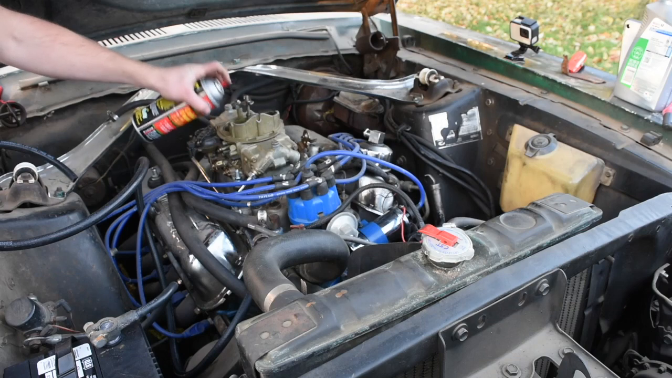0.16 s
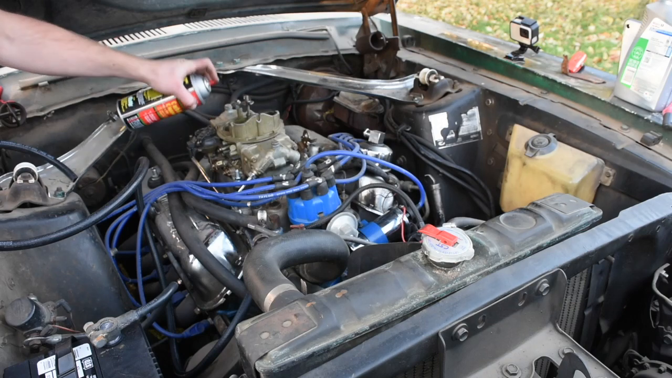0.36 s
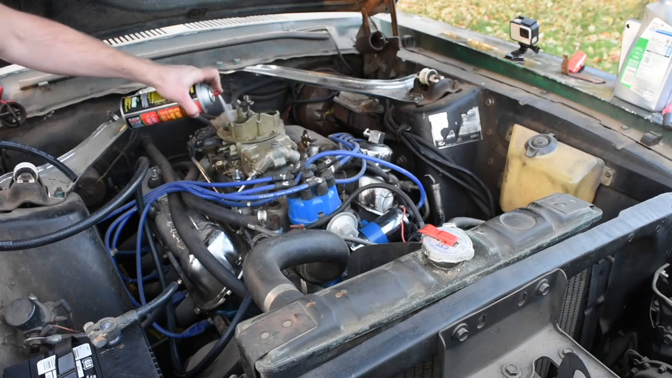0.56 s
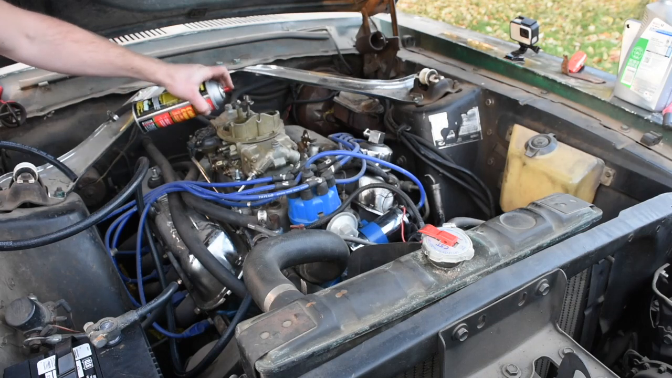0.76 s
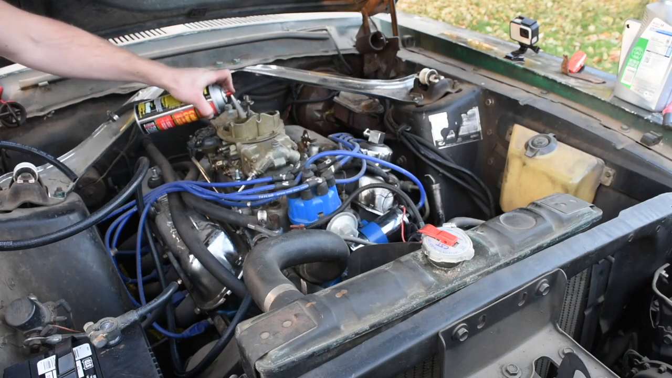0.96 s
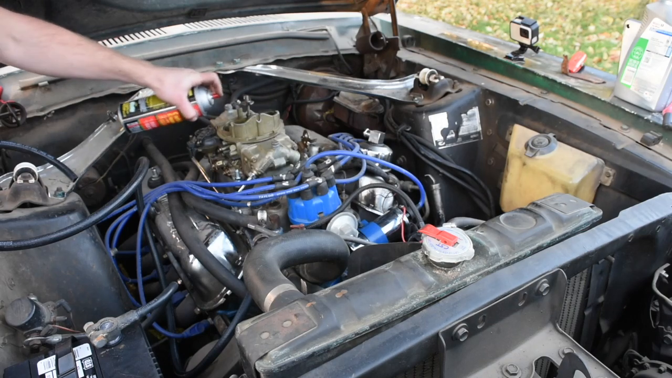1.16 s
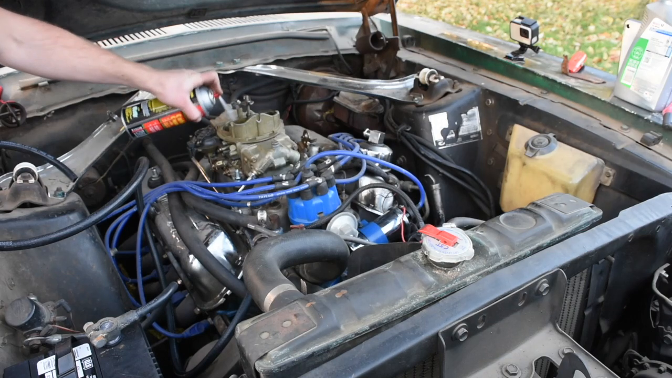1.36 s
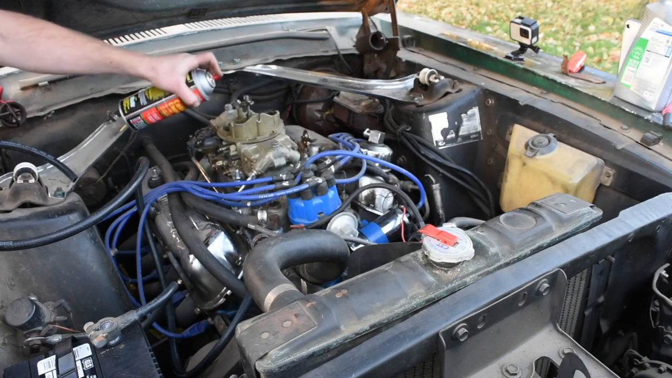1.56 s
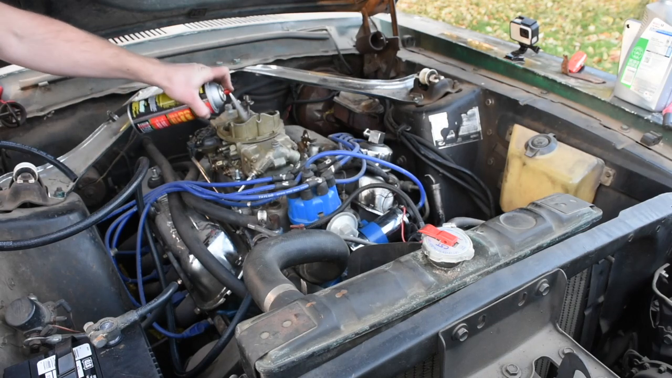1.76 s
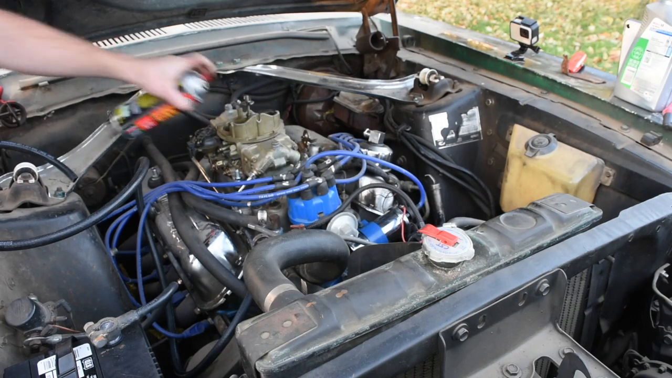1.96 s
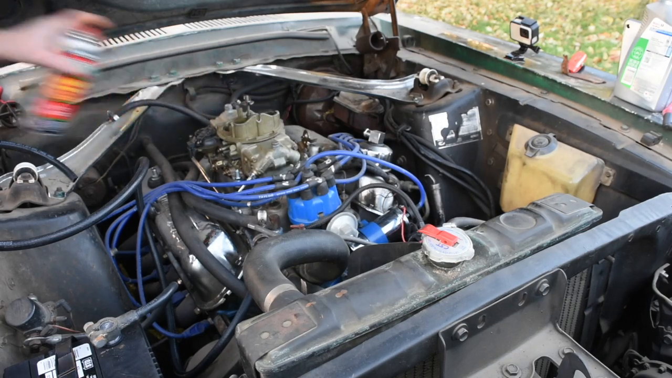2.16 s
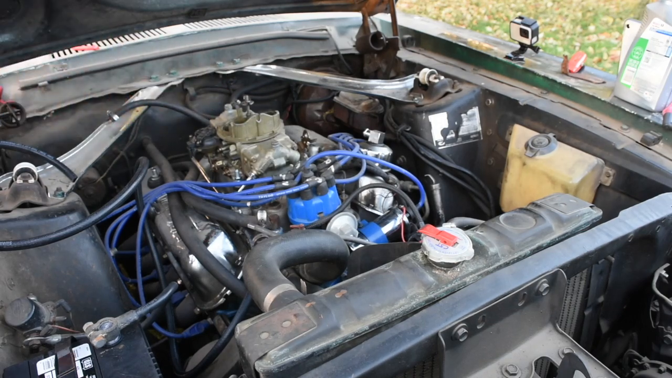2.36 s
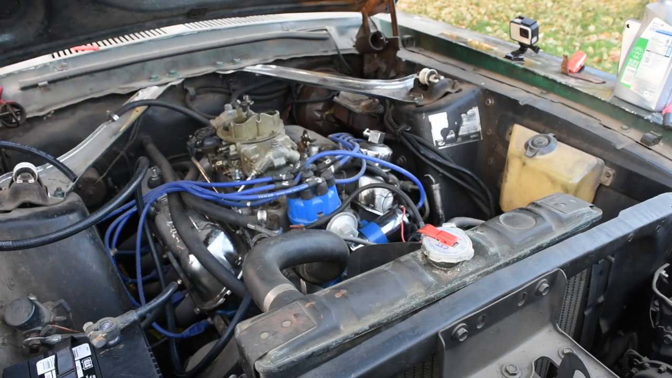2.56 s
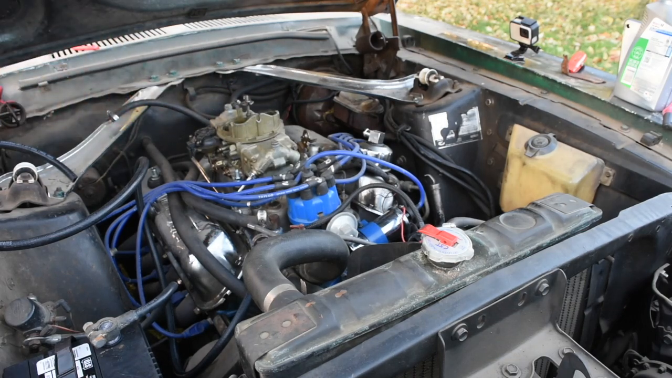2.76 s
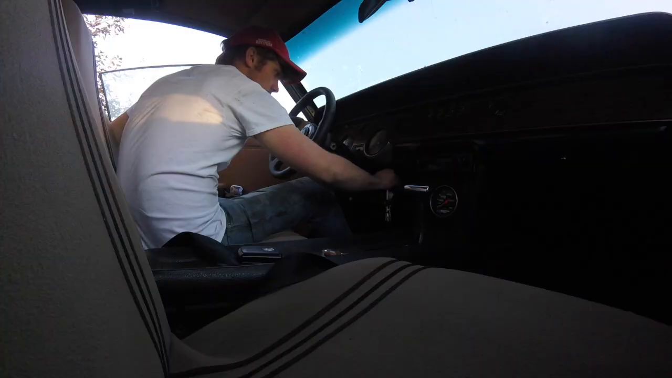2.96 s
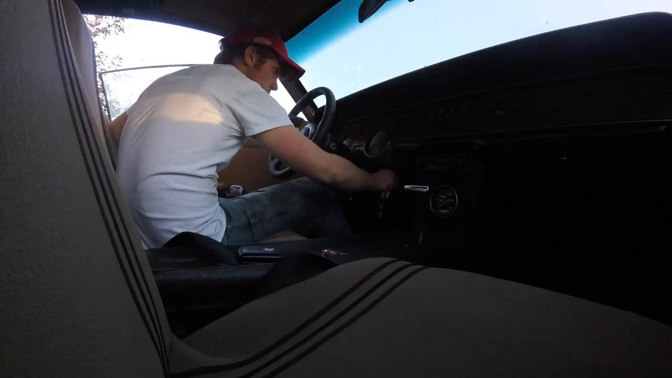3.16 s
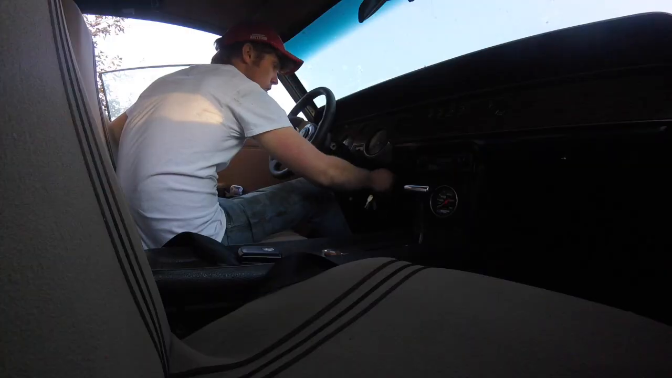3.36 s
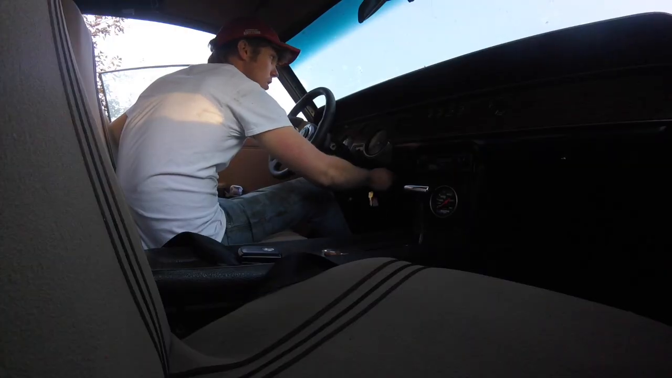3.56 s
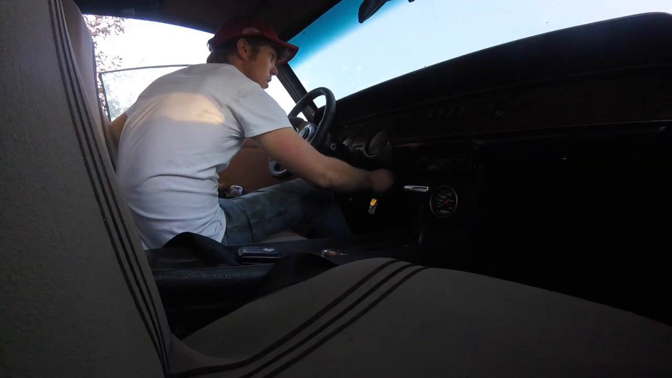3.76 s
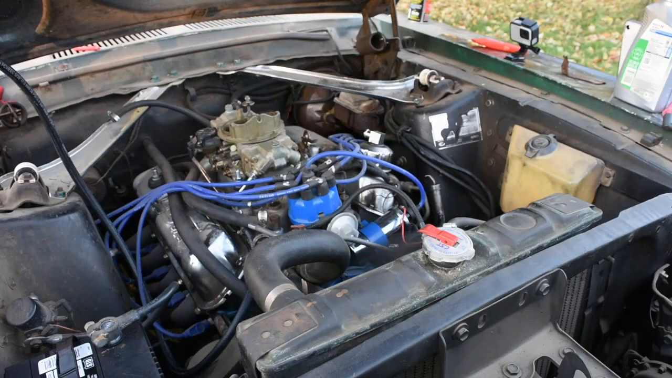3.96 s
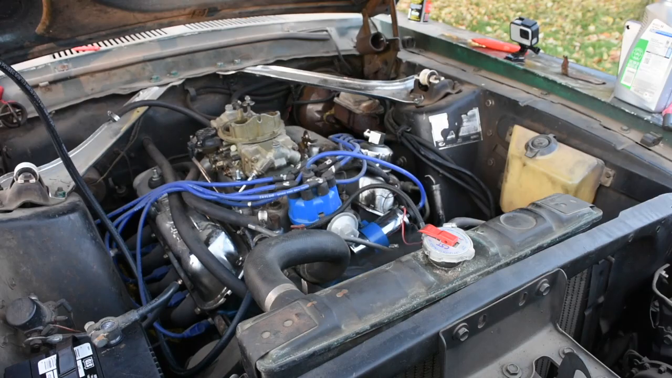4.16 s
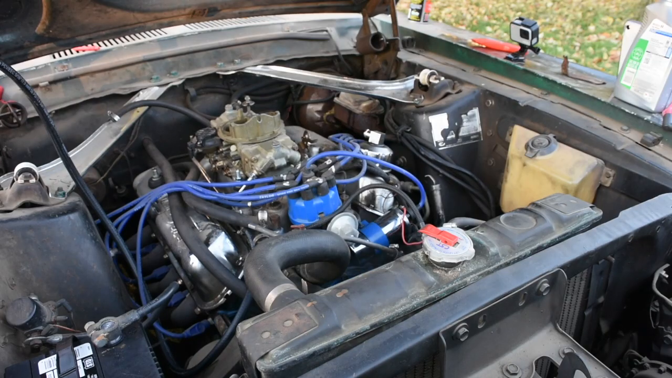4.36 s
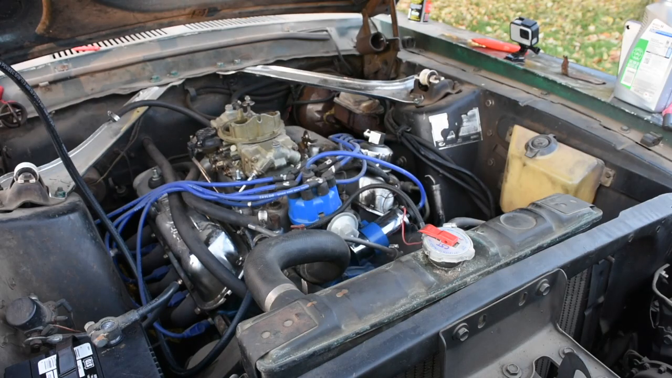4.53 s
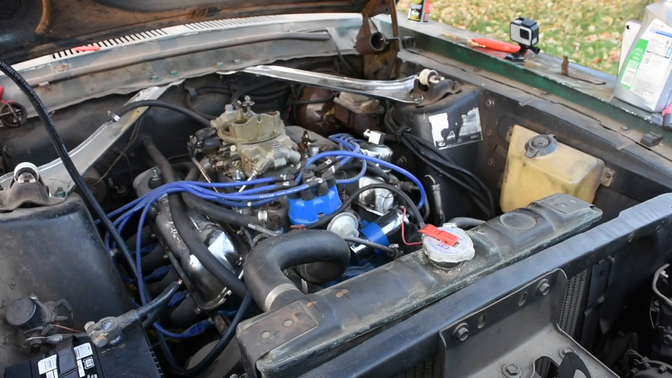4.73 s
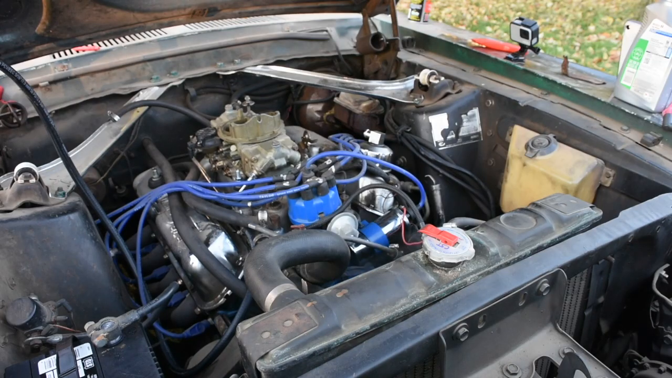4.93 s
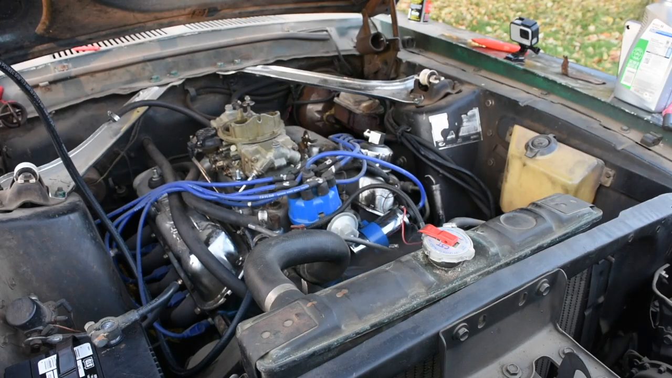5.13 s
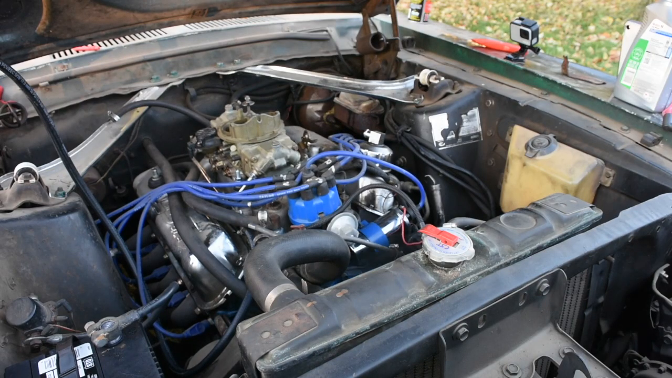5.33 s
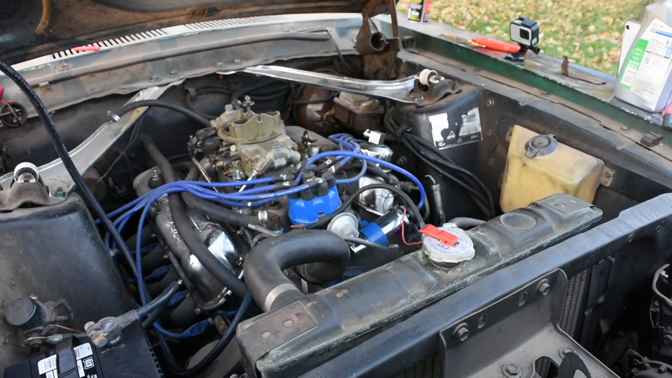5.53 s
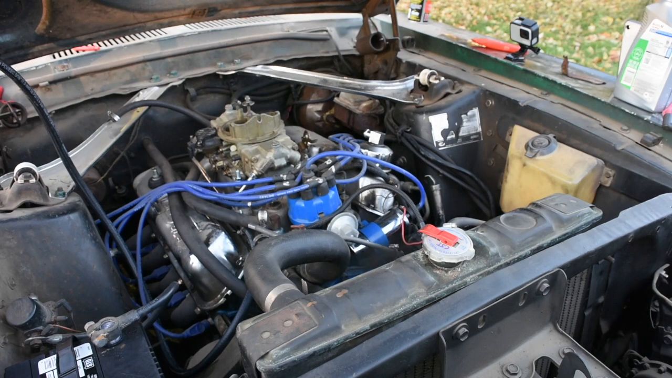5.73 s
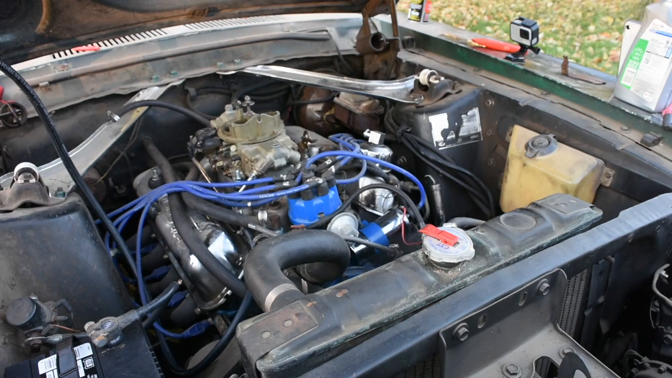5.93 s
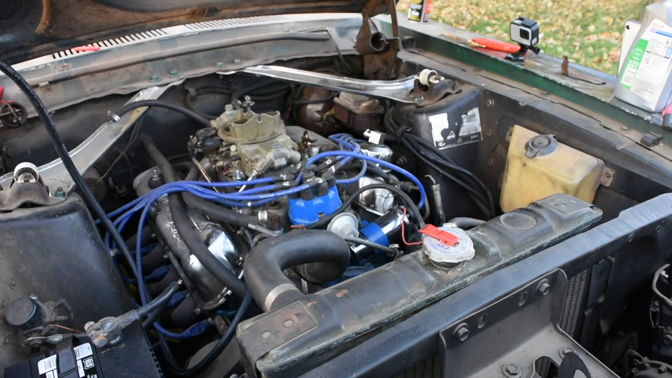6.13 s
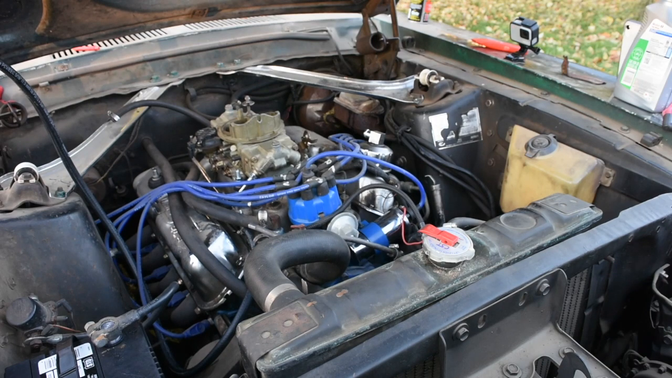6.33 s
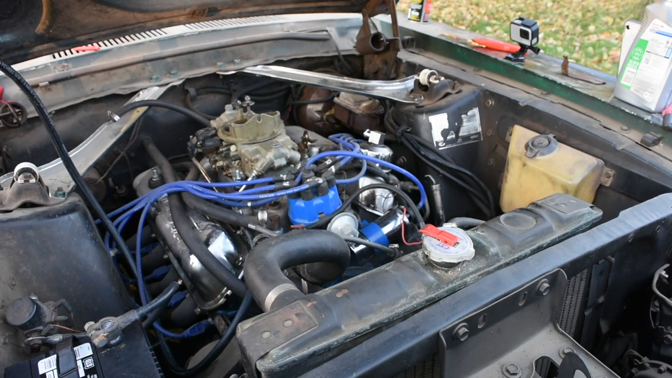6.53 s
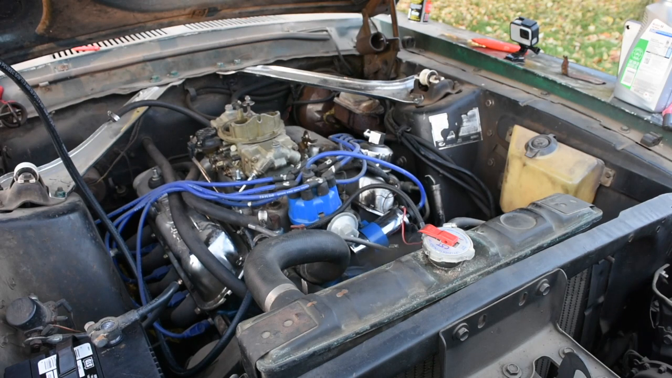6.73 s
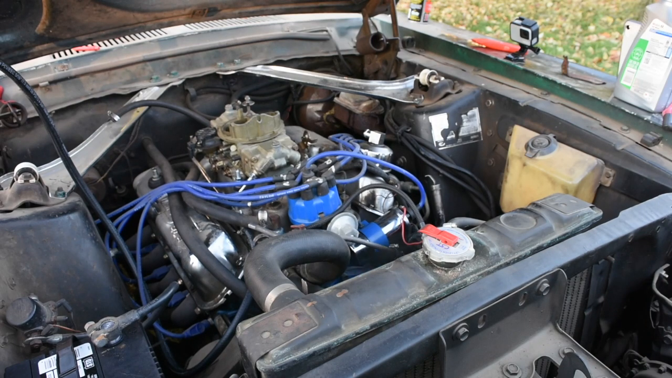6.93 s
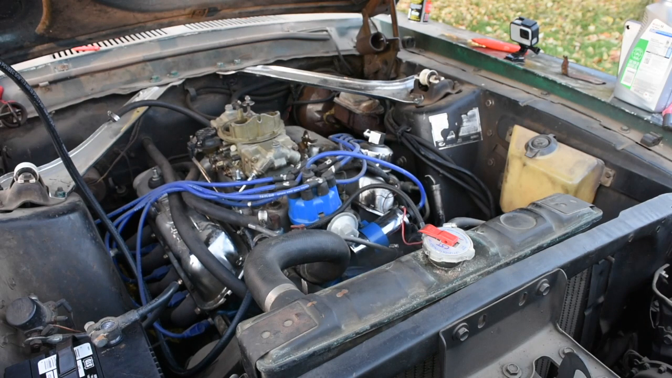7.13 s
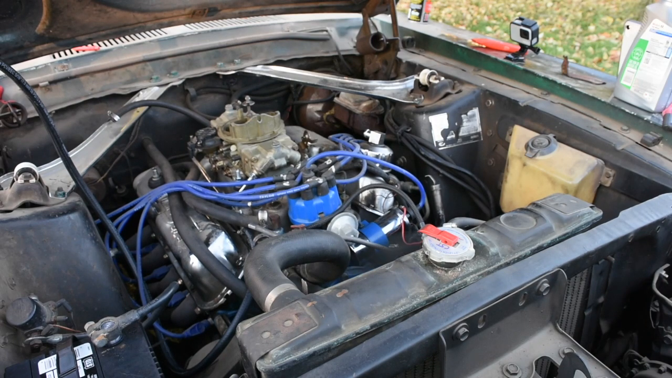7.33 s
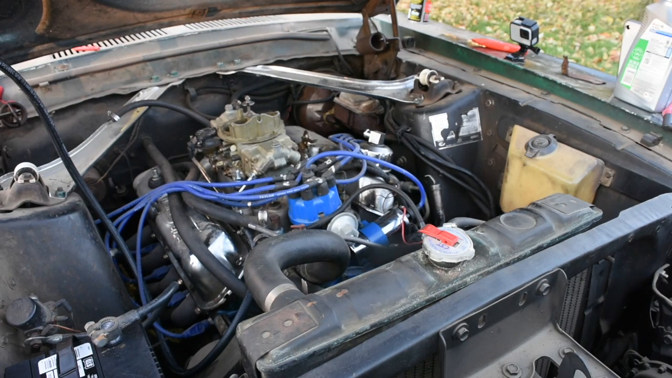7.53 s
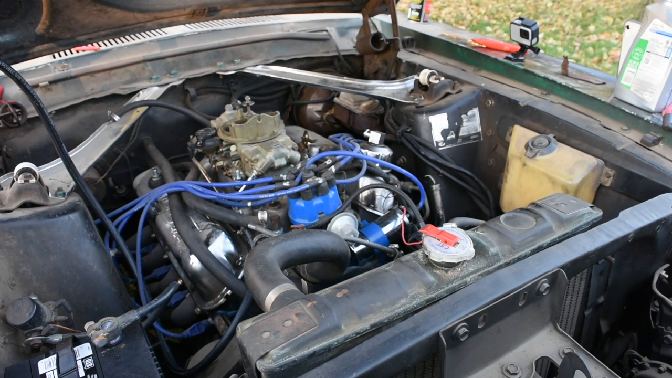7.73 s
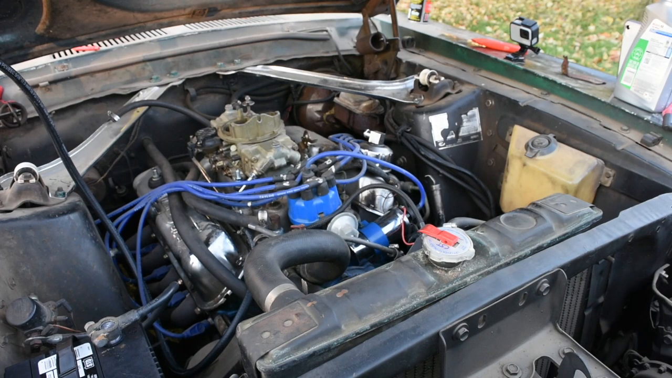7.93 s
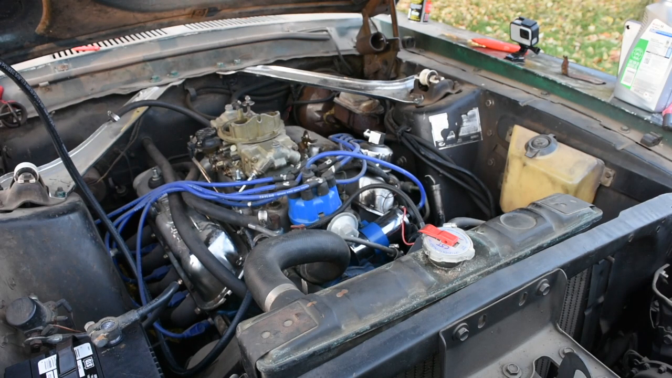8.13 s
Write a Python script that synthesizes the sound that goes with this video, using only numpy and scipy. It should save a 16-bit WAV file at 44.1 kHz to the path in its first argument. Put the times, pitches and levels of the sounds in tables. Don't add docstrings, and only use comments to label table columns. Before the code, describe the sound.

Aerosol can squirts five hissing bursts into a hollow carburettor throat, a door thuds, then an old engine cranks noisily without starting and stops with clunks.

```python
import sys
import numpy as np
from scipy import signal
from scipy.fft import rfft, irfft, next_fast_len
from scipy.io import wavfile
from scipy.ndimage import uniform_filter1d, map_coordinates

SR = 44100
rng = np.random.default_rng(int(sys.argv[2]) if len(sys.argv) > 2 else 0)


def int16_out(signal):
    q = np.round(np.clip(np.atleast_2d(signal).T, -1, 1) * 32767)
    wavfile.write(sys.argv[1], SR, q.astype(np.int16))


def invert_db(x):
    u = np.asarray(x, float) / 20
    return 10 ** u


N = 361179
T = np.arange(N) / SR

# pitch_hz, level_db_per_hz
YARD = [(15, -26.5), (25, -19.5), (59, -2.5), (126, -6.5), (199, -14.5), (260, -15.5), (400, -22),
        (434, -21.5), (471, -19.5), (1670, -33), (2020, -32.5), (15600, -42)]
# pitch_hz, likeness (0-1)
YARD_ALIKE = [(60, 1), (240, 0.97), (950, 0.8), (3770, 0.14), (15000, 0.25)]
# pitch_hz, level_db
HUM = [(129.2, -58), (263.8, -61.5), (1114, -77), (1723, -80), (2169, -81)]
HUM_ON_S = 2.94
YARD_DB, RECOVER_S, DUCKED_DB, RECOVER_DB_PER_S = -53.5, 7.92, -6.5, 36

# start_s, level_db, pitch_hz
TICKS = [(.48, -64, 2400), (.812, -50, 2200), (1.28, -62, 11000), (2.077, -55, 4000), (2.192, -50, 2050),
         (2.212, -60, 2300), (2.238, -64, 2400), (2.288, -60, 2300), (2.302, -56, 2400)]
# open_s, shut_s, hiss_db, dribble_before_s
SQUIRTS = [
    (-.1, 0.198, -21.5, 0.0079),
    (0.539, 0.722, -20, .004),
    (.937, 1.145, -21, 0.031),
    (1.368, 1.493, -20.5, 0.028),
    (1.766, 1.913, -20.5, 0.055),
]
# pitch_hz, upper_mode_hz, aim_db
THROAT = [
    (790, 5290, -3),
    (900, 6370, -1.5),
    (865, 4555, 0),
    (870, 4850, -.5),
    (800, 4790, -3.5),
]
# pitch_hz, level_db_per_hz
JET = [(650, -44.5), (1100, -16.5), (1500, -14), (2100, -9.5), (4000, -8), (6000, -6.5), (8300, -4.5),
       (10600, -1), (15600, -2.5)]
# pitch_hz, level_db_per_hz
SPLASH = [(120, -4.5), (250, -5.5), (450, 1), (700, 2), (1100, -13), (2000, -38)]
OPEN_S, SHUT_DB_PER_S = .008, 1502
DRIBBLE_DB, FIZZ_DB, FIZZ_DB_PER_S = -34, -28, 218.5
THROAT_DB, UPPER_DB, UPPER_GROWS = -34.5, -34, 1.8

# start_s, peak_db
BLOWS = [
    (2.784, -12),
    (3.373, -3.5),
    (7.916, -5),
    (8.092, -20),
]
# pitch_hz, level_db, t60_s
RINGS = [
    [(122, 2, 0.38), (312, -10, 0.34), (864, -13, 0.26), (1115, -17, 0.15), (1180, -16, 0.18),
     (1250, -17, 0.27)],
    [(688, -4.5, 0.093), (1095, -11.5, 0.18), (1496, -9, 0.015)],
    [(358, -26, 0.9), (484, -10, 0.48), (570, 0, 0.14), (756, -22, 0.25), (916, -13, 0.17),
     (970, -8, 0.054), (1250, -9, 0.17), (1980, -11.5, 0.13), (2170, -15.5, 0.09), (3620, -1, 0.04)],
    [(810, -7.5, 0.084), (1170, -13.5, 0.4), (1590, -16, 0.175), (1850, -14, 0.12), (2230, -4, 0.18),
     (2880, -12, 0.176), (3000, 9, 0.063), (3240, -1, 0.086)],
]
# pitch_hz, level_db_per_hz
CRASH = [
    [(35, -32), (60, 5.5), (144, -6.5), (526, -16.5), (1790, -17), (2470, -22.5), (3050, -19.5),
     (15000, -58)],
    [(120, -44), (200, -11), (721, -1.5), (1330, -24), (4090, -20), (5450, -22.5), (15000, -25)],
    [(29, -45), (50, -15), (359, -16), (623, -3.5), (1060, -19.5), (1670, -11), (2510, -16.5),
     (2970, -14.5), (6730, -11.5), (15600, -29)],
    [(120, -40), (200, -5), (814, -11), (995, -15), (1490, -7), (1690, -18), (2970, 0), (3700, -17.5),
     (15600, -13)],
]
# pitch_hz, t60_s
DYING = [
    [(100, 0.46), (1000, .22), (8000, 0.11)],
    [(300, 0.1), (2000, 0.14), (8000, 0.11)],
    [(300, 0.23), (700, 0.11), (2000, 0.08), (8000, 0.037)],
    [(300, 0.42), (3000, 0.15), (10000, 0.069)],
]
# start_s, level_db, pitch_hz, t60_s, rise_s
KNOCKS = [(3.374, -23, 400, 0.088, .002), (3.418, -14, 168, 0.16, 0.0047), (3.424, -7.5, 478, 0.078, .003),
          (3.436, -15, 850, 0.12, 0.0024), (3.408, -2, 4000, .05, .003), (3.415, -7, 2000, 0.12, .004),
          (3.455, -6, 474, 0.1, 0.0026), (3.475, -10, 353, 0.12, .004), (3.572, -13, 754, 0.29, 0.0088),
          (6.4, -21, 780, .1, .004), (7.725, -19.5, 760, 0.091, .004), (7.801, -34, 850, .04, .001),
          (7.803, -38, 3220, .04, .001), (7.82, -38, 5200, .04, .001), (7.837, -32, 2950, 0.032, 0.00095),
          (7.853, -36, 3150, 0.034, .001), (3.535, -13, 410, .2, .015), (3.535, -14, 1235, .2, .015),
          (3.52, -17, 4200, .14, .01), (3.608, -15, 3600, .15, .004), (7.675, -23, 3500, 0.13, .005),
          (7.69, -16, 3150, 0.088, .004), (7.705, -15, 3200, 0.055, 0.0037), (7.61, -16, 1290, .12, .004),
          (6.8, -23, 3600, .1, .004), (7.735, -37, 2580, 0.18, .004), (7.92, -19, 3300, .05, 0.00198),
          (7.855, -38, 2350, 0.16, .003), (8.12, -40, 2230, 0.18, .004), (7.93, -51, 1500, 1.2, .01),
          (8.077, -49, 4130, 0.036, .001), (8.094, -31, 8700, .04, 0.00082), (8.11, -35, 4440, 0.044, .001),
          (8.112, -48, 4500, 0.16, .004)]

# time_s, level_db
BLEED = [(7.74, -29), (7.78, -36), (7.81, -37), (7.89, -38.5), (7.97, -44), (8.19, -56)]
# pitch_hz, level_db_per_hz
BLEED_COLOUR = [(35, -35), (60, -6.5), (290, 1), (462, -7), (1350, -7), (3080, -15.5), (6000, -25),
                (15600, -51)]
# start_s, level_over_leak_db
CHATTER = [(7.803, -31.5), (7.82, -36), (7.837, -35), (7.853, -35), (7.872, -39), (7.888, -40)]
CHATTER_DB, CHATTER_S = 33.5, 0.0043
# start_s, highest_s, end_s, top_hz, bend_share
WHISTLES = [(7.768, 7.818, 7.912, 9850, 1), (7.812, 7.83, 7.89, 11950, .1),
            (7.805, 7.81, 7.905, 14150, .75), (7.783, 7.81, 7.818, 11500, .1), (7.73, 7.73, 7.775, 8500, 2)]
WHISTLE_DB, HIGHER_DB = -53.5, -4
BEND_UP, BEND_DOWN = 80, 215

# fastest_s, fast_tooth_hz, slowest_s, slow_tooth_hz, seal_db
RUN_UP = [
    (3.535, 565, 3.612, 455, 0),
    (3.638, 503, 3.665, 492, -3),
    (3.7, 521, 3.752, 440, -2),
    (3.797, 513, 3.838, 490, -2),
]
# fastest_share, fast_tooth_hz, slowest_share, slow_tooth_hz, seal_db
CYLINDERS = [(.001, 525, .066, 489, 1), (.13, 549, .19, 496, 2), (.25, 555, .32, 490, 2),
             (.378, 559, .435, 505, 1.8), (.503, 573, .552, 552, -1.4), (.588, 568, .686, 464, .4),
             (.742, 536, .793, 502, -3), (.85, 538, .93, 450, -1.3)]
# cycle_share, level_db, width_s
TORQUE = [(0.033, -1, 0.01), (.082, -1.5, 0.0039), (0.146, 0, 0.011), (0.186, -0.5, 0.0089),
          (.288, -1.5, 0.02), (0.407, -1.5, 0.015), (.52, -4.5, 0.011), (0.634, 0.5, 0.022),
          (.755, -3.5, .011), (0.791, -4.5, 0.0078), (0.875, -1.5, 0.025), (.95, 1, 0.014)]
FIRST_CYCLE_S, CYCLE_S, SLOWS_S = 3.953, .6013, .0014
SPIN_S, SPIN_HZ = 3.44, 430
SEATED_S, SEATING_S, LOOSE_DB = 3.615, 0.049, -2
BREAKAWAY_S, BREAKAWAY_DB = 3.51, -3
KEY_OFF_S, COAST_DB_PER_S, COAST_HZ_PER_S = 7.605, 394.5, 2700

# start_s, rise_s, t60_s
JOLTS = [
    (3.402, 0.015, 0.096),
    (3.449, 0.1, 0.62),
    (7.595, 0.087, 0.33),
    (7.684, 0.017, 0.1),
    (7.702, 0.022, 0.12),
]
# grind_db, thud_db, rattle_db, clatter_db
SHAKEN = [
    (-18, -38, -6, -18),
    (-63, -17.5, -52.5, -20.5),
    (-30, -28.5, -29.5, -21),
    (-22.5, -31, -32, -29.5),
    (-40, -21, -52.5, -21),
]

# multiple_of_tooth_rate, level_db
MESH = [(1 / 3, -27), (2 / 3, -23), (1, -11), (2, -12), (3, -3), (4, -14.5), (5, -8.5), (6, -9), (7, -11),
        (8, -15), (9, -17), (10, -25)]
# multiple_of_tooth_rate, level_db
LOOSE_MESH = [(0.7, -14), (7 / 3, -12), (11 / 3, -15)]
SOFT_HZ, SOFT_SPAN_HZ = 470, 50
WEAR_DB, WEAR_SPOTS = 2.5, 60
# pitch_hz, level_db_per_hz
GRIND = [(500, -49), (900, -16.5), (1500, 1.5), (1900, -11), (2400, -6), (3200, -0.34), (4500, -3.5),
         (6000, -10.5), (8000, -14), (12000, -43.5)]
# pitch_hz, level_db_per_hz
RUMBLE = [(59, -40), (100, -11), (258, -8.5), (343, -10), (386, -12), (533, -0.5), (689, -8), (900, -14),
          (1170, -65), (1980, -120)]
# pitch_hz, level_db_per_hz
RATTLE = [(2000, -29), (4000, -3.5), (7000, 2), (10000, 1.5), (12000, -6.5), (15700, -14.5)]
# pitch_hz, level_db_per_hz
SHAKE = [(18, -15), (35, 2), (55, -5), (90, -4), (140, -44.5)]
# pitch_hz, level_db_per_hz
THUD = [(30, -40), (60, -6), (110, -6.5), (250, -4), (345, -6.5), (450, -2.5), (750, -8), (1100, -39),
        (2000, -64)]
# pitch_hz, level_db_per_hz
CLATTER_COLOUR = [(500, -32.5), (900, -2.5), (1300, 9.5), (2100, 0), (3500, -0.5), (6000, -42)]
# pitch_hz, level_db_per_hz
BRUSHES = [(5000, -29), (9000, -10), (12000, 0), (15800, -6)]
GRIND_DB, RUMBLE_DB, RATTLE_DB, WHINE_DB, BRUSH_DB = -19.5, -31.5, -29, -17.5, -38.5

# pitch_hz, width_hz, level_over_plain_db
HOUSING = [(2076, 30, 2), (2104, 130, 9.5), (2676, 63, 4.5), (2790, 80, 9), (2914, 43, 8), (2330, 50, 8),
           (1900, 46, 8.5), (1497, 17, 5.5), (1580, 350, 6.5), (1805, 100, -5.5), (2260, 70, -5.5),
           (3100, 39, 9.5), (3204, 46, 3.5), (3320, 50, 3), (3568, 94, 9.5), (3450, 40, 6), (4206, 43, 11),
           (4460, 35, 6.5), (4710, 40, 10), (4925, 32, 13.5), (5023, 40, 14), (4800, 30, 9),
           (4070, 30, 4.5)]
# pitch_hz, width_hz, level_over_plain_db
PANELS = [(177.3, 3, 11.5), (343, 5, 9.5), (480.5, 6.3, 5.5), (760, 7, 15.5), (947, 22, 9),
          (1019, 12, 10.5), (1114, 44, 6.5), (1444, 43, -42), (2445, 79, 8.5)]
# pitch_hz, width_hz (unused), level_db
RING_GEAR = [(5540, 56, 0), (5840, 82, -1), (6420, 48, -4), (6780, 160, -2), (7040, 90, -4), (7340, 75, -2),
             (7630, 52, -1), (7780, 55, -8), (8560, 74, -5), (9050, 65, -10), (9500, 70, -7),
             (9860, 110, -8)]
# pitch_hz, width_hz, share_taken_out
NULLS = [(979, 18, .6), (1426, 30, 0.36), (1980, 40, 0.46), (2256, 50, 0.38), (2440, 80, .35),
         (3670, 46, 0.24), (4010, 110, .45), (4300, 50, 0.71), (5100, 70, .3), (5510, 60, .4),
         (5690, 60, .55), (6020, 37, .5)]
# cycle_share, pitch_hz, level_db
SINGS = [(.01, 3130, -15.5), (.02, 3570, -32), (.03, 5050, -23), (.065, 3380, -26), (.07, 2890, -23),
         (.09, 4230, -26.5), (.115, 3250, -25), (.135, 2760, -20), (.155, 3130, -21), (.22, 2900, -25),
         (.25, 2700, -19), (.26, 3200, -21), (.29, 3050, -26), (.3, 4450, -27), (.37, 3300, -20),
         (.385, 3050, -27), (.385, 2800, -29), (.39, 4950, -27), (.4, 3600, -20), (.43, 3590, -24),
         (.445, 3090, -19), (.45, 5050, -25), (.495, 3100, -20), (.49, 3590, -17), (.51, 2890, -22),
         (.52, 5050, -31), (.56, 2800, -27), (.585, 3370, -22), (.61, 2790, -26), (.63, 3120, -27),
         (.65, 4950, -30), (.665, 2350, -23), (.665, 1900, -28), (.67, 4220, -26), (.7, 2900, -17),
         (.73, 3120, -14), (.74, 3700, -25), (.74, 2650, -22), (.75, 4230, -27), (.77, 3580, -21),
         (.79, 3040, -18.5), (.85, 3180, -20), (.85, 4230, -24), (.85, 2640, -24), (.91, 5030, -23),
         (.915, 3620, -23.5), (.96, 2900, -20), (.98, 3570, -21)]
SING_S, SING_DB, SING_STRAY_HZ = .011, 0.1, 24.9
BAY_T60_S, BAY_DB, BAY_HZ = .08, 3, 2000
NOISE_RINGS = .65

# pitch_hz, side_minus_mid_db
WIDTH = [(100, -24), (700, -27), (4000, -37), (7000, -21.5), (9500, -9.5), (12000, -7.5), (15600, -7)]
# pitch_hz, left_minus_right_db
LEAN = [(60, -2.5), (380, -0.9), (1500, -1.47), (3000, -1.5), (5000, 0.1), (8000, -1.5), (15000, -1.5)]
# pitch_hz, left_lead_radians
LEAD = [(0, 0), (9220, 0.1), (9820, 0.4), (10900, 0.1), (12500, 0.6), (12900, 0.4), (16500, -0.0)]
CEILING, TOP_HZ = .6, 15850


def unit(x):
    return x / np.sqrt(np.mean(x ** 2) + 1e-20)


def along(points, hz):
    f, v = np.transpose(points)
    return np.interp(np.log(hz + 1), np.log(f + 1), v)


def curves(rows):
    s, *cols = np.transpose(rows)
    return [np.interp(T, s, c) for c in cols]


def wobble(rate):
    coarse = T[::16]
    knots = rng.standard_normal(int(N * rate / SR) + 4)
    return np.interp(T, coarse, map_coordinates(knots, [coarse * rate]))


def filtered(x, response):
    m = next_fast_len(x.shape[-1] + SR // 4)
    return irfft(rfft(x, m) * response(np.fft.rfftfreq(m, 1 / SR)), m)[..., :x.shape[-1]]


def peak(f, hz, width):
    return 1j * f * width / (hz * hz - f * f + 1j * f * width)


def noise(spectrum, count=N):
    return unit(filtered(rng.standard_normal(count), lambda f: invert_db(along(spectrum, f))))


def gate(start, end, edge):
    return np.clip(np.minimum(T - start, end - T) / edge, 0, 1)


def swells(events, width):
    marks = np.zeros(N + SR)
    marks[(events[0] * SR).astype(int)] = invert_db(events[1])
    u = np.arange(-SR // 10, SR // 10 + 1) / SR
    return signal.fftconvolve(marks, np.exp(-.5 * (u / width) ** 2), "same")[:N]


def cycle_swell(share, at, width_s):
    away_s = ((share - at + .5) % 1 - .5) * CYCLE_S
    return np.exp(-.5 * (away_s / width_s) ** 2)


def yard():
    turn = lambda f: np.arccos(np.clip(along(YARD_ALIKE, f), -1, 1)) / 2
    both = np.array([noise(YARD), noise(YARD)])
    mid, side = filtered(both, lambda f: [np.cos(turn(f)), np.sin(turn(f))])
    ducked_db = (T > 5) * (DUCKED_DB + RECOVER_DB_PER_S * np.maximum(T - RECOVER_S, 0))
    buzz = sum(np.sqrt(2) * invert_db(db + wobble(10)) * np.sin(2 * np.pi * hz * T) for hz, db in HUM)
    air = invert_db(YARD_DB + wobble(1.5) + ducked_db) * np.array([mid + side, mid - side])
    return air + buzz * gate(HUM_ON_S, 4.0, .01)


def ticks():
    out, t = np.zeros(N), T[:SR // 10]
    for s, db, hz in TICKS:
        shake = rng.standard_normal(len(t)) * gate(0, .04, .001)[:len(t)] * invert_db(6.5 - 60 * t / .06)
        tin = filtered(shake, lambda f: peak(f, hz, 170) + 0.07 * peak(f, 4800, 5000) ** 2)
        out[round(s * SR):][:len(t)] += invert_db(db + 11.5) * tin
    return out


def flow():
    out = np.full(N, 1e-5)
    for start, end, db, lead in SQUIRTS:
        after = np.maximum(T - end, 0)
        fading = invert_db(-SHUT_DB_PER_S * after) + invert_db(FIZZ_DB - FIZZ_DB_PER_S * after)
        jet = gate(start - OPEN_S / 2, 9, OPEN_S) ** 2 * fading
        out += invert_db(db) * (jet + invert_db(DRIBBLE_DB) * gate(start - lead, end, lead / 2))
    return 20 * np.log10(out)


def throat(hz, upper_hz, aim_db):
    air = rng.standard_normal((2, 2 * SR))
    low = unit(filtered(air[0], lambda f: peak(f, hz, 75) * peak(f, hz, 380)))
    modes = lambda f: sum(gain * peak(f, ratio * upper_hz, 70) for ratio, gain in [(1, 1), (1.5, .33), (1.6, .65)])
    upper = unit(filtered(air[1], modes))
    return invert_db(THROAT_DB + aim_db) * low + invert_db(UPPER_DB + UPPER_GROWS * aim_db) * upper


def spray():
    z = signal.stft(noise(JET), nperseg=1024)[2]
    comb = uniform_filter1d(rng.standard_normal(z.shape), size=3, axis=0)
    comb = uniform_filter1d(comb, size=24, axis=1)
    hiss = unit(signal.istft(z * invert_db(2.8 * unit(comb)), nperseg=1024)[1][:N])
    flow_db = flow()
    dull = unit(filtered(hiss, lambda f: 1 / (1 + (f / 7000) ** 4)))
    weak = np.clip((-30.0 - flow_db) / 22, 0, 1)
    out = (1 - weak) * hiss + weak * dull + invert_db(-27.5) * noise(SPLASH)
    out *= invert_db(flow_db + 0.84 * wobble(60.13))
    for (start, end, *_), modes in zip(SQUIRTS, THROAT):
        out[:2 * SR] += gate(start, end + 0.023, 0.032)[:2 * SR] * throat(*modes)
    return out


def blows():
    out, t = np.zeros(N + SR), np.arange(SR // 2) / SR
    ring_dbs, crash_dbs = [-8.0, -1.0, -9.0, -10.0], [-5, -6, -4.5, -4.5]
    rises_s = [0.0004, 0.00087, 0.0045, 0.0046]
    rows = zip(BLOWS, RINGS, CRASH, DYING, ring_dbs, crash_dbs, rises_s)
    for (s, db), modes, colour, dying, ring_db, crash_db, rise in rows:
        ring = sum(invert_db(level - 60 * t / t60) * np.sin(2 * np.pi * hz * t) for hz, level, t60 in modes)
        hz, frames, z = signal.stft(noise(colour, count=len(t)), SR, nperseg=256)
        fading = invert_db(-60 * frames / along(dying, hz)[:, None])
        crash = signal.istft(z * fading, SR, nperseg=256)[1][:len(t)]
        hit = invert_db(ring_db) * ring + invert_db(crash_db) * crash
        out[round(s * SR):][:len(t)] += invert_db(db) * hit * (1 - np.exp(-t / rise))
    out = out[:N] * (1 - gate(HUM_ON_S, 3.37, .004))
    return filtered(out, lambda f: (1j * f / (66 + 1j * f)) ** 4)


def knocks():
    out, t = np.zeros(N + SR), T[:SR // 2]
    for s, db, hz, t60, rise in KNOCKS:
        crack = uniform_filter1d(rng.standard_normal(len(t)), size=7) * invert_db(-60 * t / .02)
        ring = invert_db(-60 * t / t60) * np.sin(2 * np.pi * hz * t) * (1 - np.exp(-t / rise))
        out[round(s * SR):][:len(t)] += invert_db(db) * (ring + crack * (rise < .0025))
    return out[:N]


def leak():
    out = invert_db(curves(BLEED)[0] + 1.7 * wobble(40) + 1.9 * wobble(220)) * noise(BLEED_COLOUR)
    out *= gate(7.745, 8.3, 0.018)
    s, db = np.transpose(CHATTER)
    out *= 0.92 + swells((s + CHATTER_S, db + CHATTER_DB), width=CHATTER_S)
    for k, (start, top, end, top_hz, bend) in enumerate(WHISTLES):
        steepness = np.where(T < top, BEND_UP, BEND_DOWN * (T - top))
        hz = top_hz * np.clip(1 - bend * steepness * (T - top) ** 2, 0, 1)
        phase = 2 * np.pi * np.cumsum(hz + 100 * wobble(350)) / SR
        level = np.sqrt(2) * invert_db(WHISTLE_DB + min(k, 1.5) * HIGHER_DB + 4 * wobble(150))
        out += level * np.sin(phase) * gate(start, end, .012)
    return out


def cycle_start(k):
    return FIRST_CYCLE_S + k * CYCLE_S + k * (k - 1) / 2 * SLOWS_S


def cycle_share():
    k = np.arange(-1, 8)
    return np.interp(T, cycle_start(k), k) % 1


def singing():
    out, span = np.zeros(N), slice(round(3.6 * SR), round(7.65 * SR), 1)
    share, fine = cycle_share()[span], np.arange(513) / 512
    stray = 2 * np.pi * np.cumsum(SING_STRAY_HZ * wobble(90))[span] / SR
    sway_db = 2.9 * wobble(45)[span]
    for k, (at, hz, db) in enumerate(SINGS):
        swell = np.interp(share, fine, cycle_swell(fine, at, SING_S))
        on = np.flatnonzero(swell > .02)
        own = (on + 3001 * k) % len(share)
        tone = np.sin(2 * np.pi * hz * on / SR + stray[own])
        out[span][on] += invert_db(db + SING_DB + sway_db[own]) * swell[on] * tone
    return out * gate(3.6, KEY_OFF_S + 0.041, 0.037)


def crank():
    k = np.arange(-1, 7)[:, None]
    start, length = cycle_start(k), CYCLE_S + k * SLOWS_S
    fast, fast_hz, slow, slow_hz, seal_db = np.transpose(CYLINDERS)
    pace = CYCLE_S / length
    columns = [start + fast * length, fast_hz * pace, start + slow * length, slow_hz * pace, seal_db + 0 * pace]
    steady = np.stack(columns, axis=2).reshape(-1, 5)
    rows = np.r_[RUN_UP, steady[steady[:, 0] > RUN_UP[-1][2]]]
    when = np.r_[SPIN_S, rows[:, [0, 2]].ravel()]
    rate = np.r_[SPIN_HZ, rows[:, [1, 3]].ravel()]
    step = np.interp(T, when, np.arange(len(when)))
    eased = np.floor(step) + (1 - np.cos(np.pi * (step % 1))) / 2
    tooth_hz = np.interp(eased, np.arange(len(when)), rate)
    tooth_hz = tooth_hz - COAST_HZ_PER_S * np.clip(T - KEY_OFF_S, 0, .1)
    load_s = np.r_[BREAKAWAY_S, .42 * rows[:, 0] + .58 * rows[:, 2]]
    load_db = np.r_[BREAKAWAY_DB, rows[:, 4] / 2]
    return tooth_hz, (load_s, load_db), (rows[:, 2] + .022, rows[:, 4])


def torque(loads, share):
    pattern = sum(invert_db(db) * cycle_swell(share, at, width) for at, db, width in TORQUE)
    steady = gate(3.84, 9, .02)
    return 0.18 + steady * pattern + (1 - steady) * swells(loads, width=0.021)


def wear(share):
    fine = np.arange(2048) / 2048
    spots = rng.standard_normal(WEAR_SPOTS)
    return np.interp(share, fine, map_coordinates(spots, [fine * WEAR_SPOTS], mode="grid-wrap"))


def effort():
    loose = 1 - gate(SEATED_S - SEATING_S / 2, 9, SEATING_S)
    coast_db = -COAST_DB_PER_S * np.maximum(T - KEY_OFF_S, 0)
    grind = invert_db(GRIND_DB + LOOSE_DB * loose + coast_db)
    rattle = invert_db(RATTLE_DB + 3.5 * LOOSE_DB * loose + coast_db)
    held = np.array([grind, 0 * T, rattle, 0 * T])
    jolts = np.array([invert_db(-60 * np.where(T < s, (s - T) / rise / 3, (T - s) / t60)) for s, rise, t60 in JOLTS])
    return invert_db(RUMBLE_DB + coast_db / 4), *(held + invert_db(np.transpose(SHAKEN)) @ jolts)


def bay(x):
    tail = rng.standard_normal(SR // 10) * invert_db(-60 * T[:SR // 10] / BAY_T60_S)
    echo = signal.fftconvolve(x, tail / np.linalg.norm(tail))[:N]
    return x + invert_db(BAY_DB) * filtered(echo, lambda f: (1j * f / (BAY_HZ + 1j * f)) ** 4)


def gear_whine(tooth_hz, turn, load, share):
    slop = .04 * wobble(250)
    speed = (tooth_hz - SOFT_HZ) / SOFT_SPAN_HZ
    impact = (.6 + .25 * load) * (.3 + .7 * gate(3.6, 9, .05))
    whine = np.zeros(N)
    for k, db in MESH:
        if k == 3:
            drive = load * np.clip(speed + .5, .5, 1)
            flutter_db = 1.1 * wobble(90)
        else:
            drive = impact * (np.clip(speed, .35, 1) if k > 4 else 1)
            flutter_db = wobble(60) + WEAR_DB * wear(share)
        whine += drive * invert_db(db + flutter_db) * np.sin(k * (turn + slop) + rng.uniform(0, 6.6))
    loose = sum(invert_db(db + 1.5 * wobble(65)) * np.sin(k * turn) for k, db in LOOSE_MESH)
    whine += gate(3.8, 3.61, 0.026) * loose
    return whine * gate(3.465, 9, .03) * gate(0, 7.65, .07)


def gear_noise(turn, overrun):
    rumbling, grinding, thudding, rattling, clattering = effort()
    grind = noise(GRIND) * (1 + 0.14 * np.cos(turn)) * invert_db(wobble(40)) * overrun ** 0.052
    rattle = noise(RATTLE) * overrun * invert_db(1.6 * wobble(500))
    gear = grinding * grind + rumbling * noise(RUMBLE) + rattling * rattle
    gear += invert_db(-45) * noise(SHAKE)
    gear += invert_db(BRUSH_DB) * gate(3.55, KEY_OFF_S + .1, .1) * noise(BRUSHES)
    gear += thudding * noise(THUD)
    gear += clattering * invert_db(3 * wobble(120)) * noise(CLATTER_COLOUR)
    return gear * gate(3.38, 7.79, 0.012)


def body(f, high_share, middle_share):
    out = 1
    for hz, width, db in PANELS + HOUSING:
        share = high_share if hz > .9 * BAY_HZ else middle_share if hz > 1500 else 1
        out = out + (invert_db(db * share) - 1) * peak(f, hz, width)
    return out


def starter():
    tooth_hz, loads, overruns = crank()
    share = cycle_share()
    load = torque(loads, share)
    overrun = .2 + swells(overruns, width=.013)
    turn = 2 * np.pi * np.cumsum(tooth_hz) / SR
    whine = bay(invert_db(WHINE_DB) * gear_whine(tooth_hz, turn, load, share))
    both = np.array([gear_noise(turn, overrun), whine])
    rim = lambda f: 1 + sum(1.4 * peak(f, hz, 60) for hz, _, _ in RING_GEAR)
    nulls = lambda f: np.prod([1 - min(cut, .9) * peak(f, hz, width) for hz, width, cut in NULLS], axis=0)
    path = lambda f: np.array([body(f, NOISE_RINGS, .2), body(f, 1, 1)]) * (rim(f) * nulls(f))
    return filtered(both, path).sum(axis=0)


def scene():
    near = ticks() + spray() + blows() + knocks() + leak() + singing() + starter()
    scatter = rng.standard_normal(SR // 20) * invert_db(-60 * T[:SR // 20] / .05)
    side = signal.fftconvolve(near, scatter / np.linalg.norm(scatter))[:N]
    side = filtered(side, lambda f: invert_db(along(WIDTH, f)))
    return np.array([near + side, near - side]) + yard()


def roll_off(x):
    return signal.sosfilt(signal.butter(12, 17000, fs=SR, output="sos"), x)


def record(dry):
    left = lambda f: invert_db(along(LEAN, f) / 2) * np.exp(.5j * along(LEAD, f) * (f < 7000))
    x = filtered(dry, lambda f: left(f) ** np.array([[1], [-1]]))
    x = x / (1 + np.abs(x / CEILING) ** 4) ** (1 / 4)
    x = filtered(x, lambda f: invert_db(-40 * (1 + np.tanh((f - TOP_HZ) / 60))))
    return roll_off(x)


dry = scene()
out = record(dry)
int16_out(out)
```